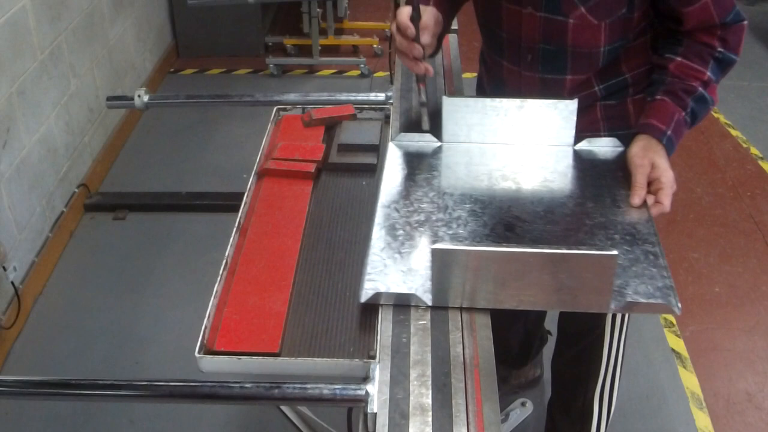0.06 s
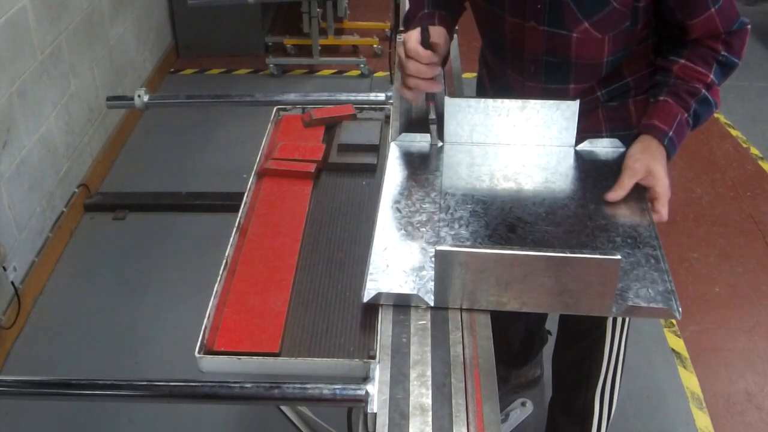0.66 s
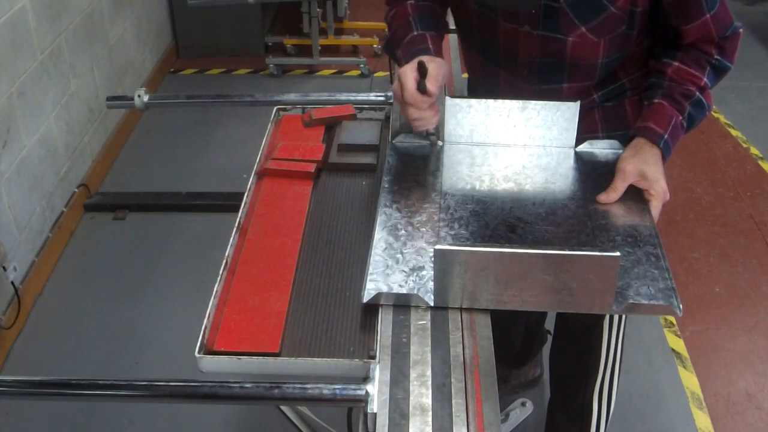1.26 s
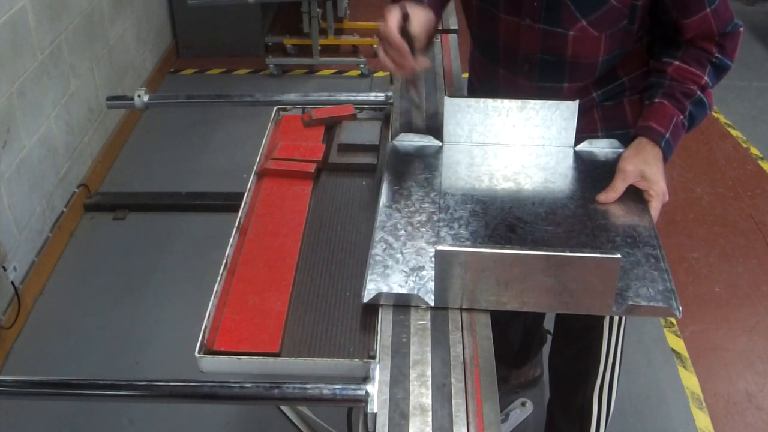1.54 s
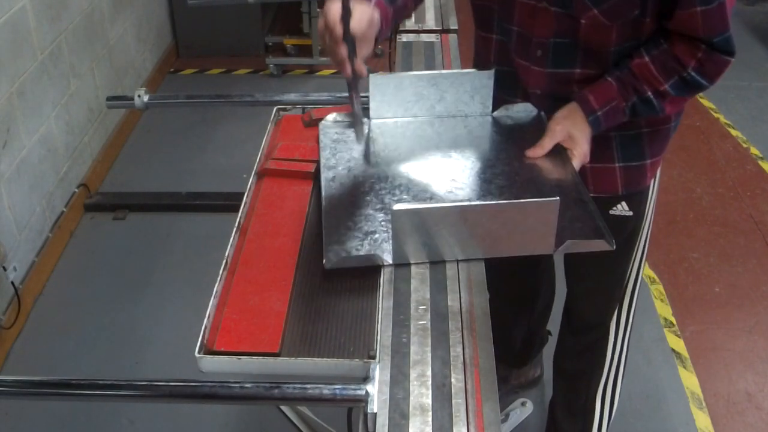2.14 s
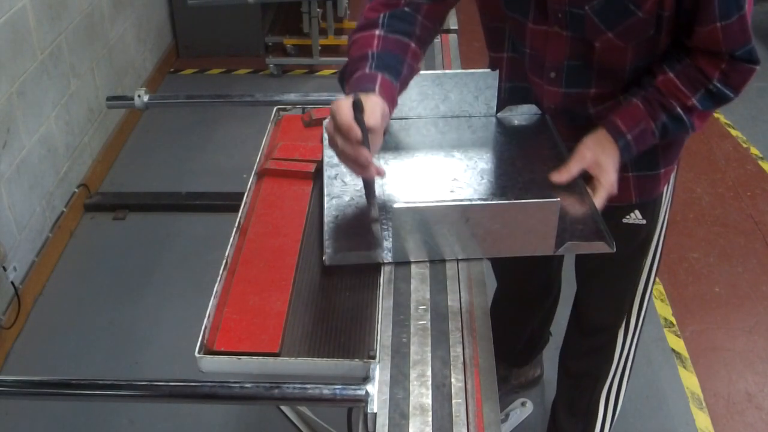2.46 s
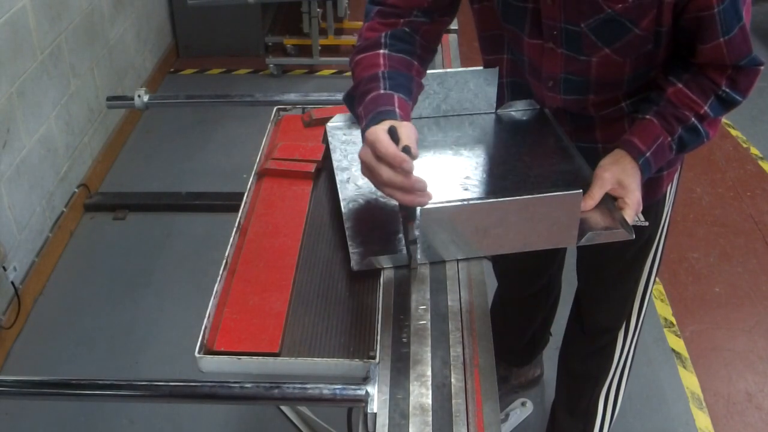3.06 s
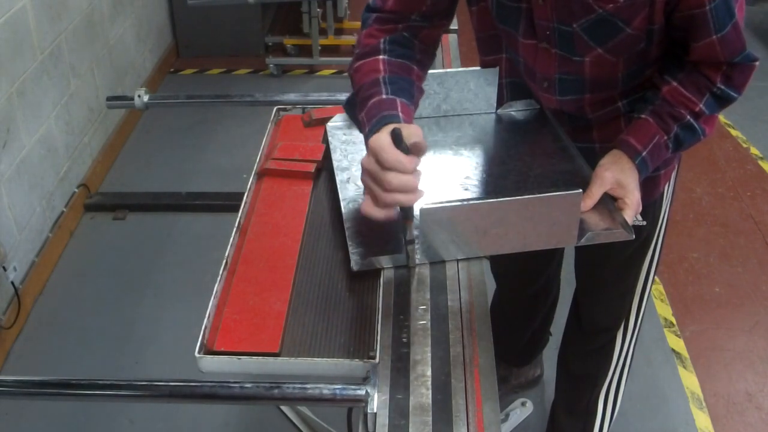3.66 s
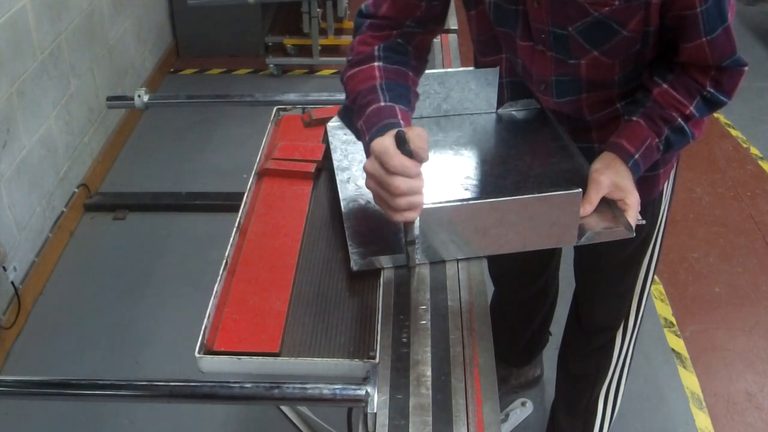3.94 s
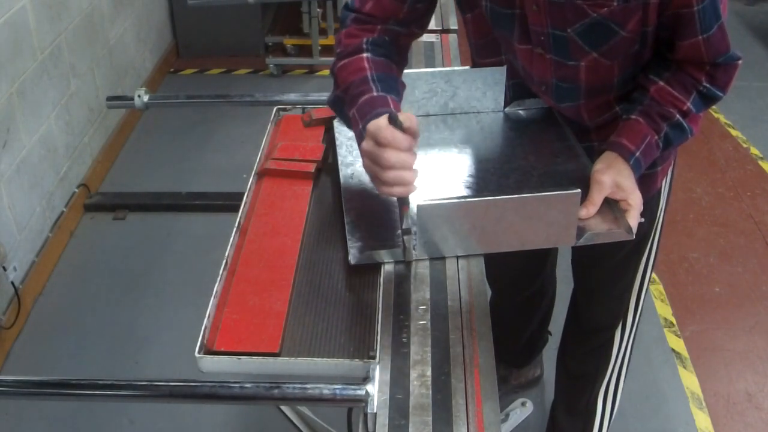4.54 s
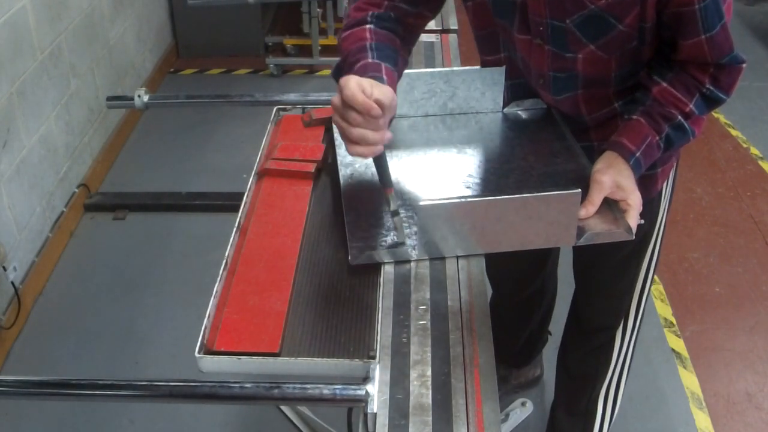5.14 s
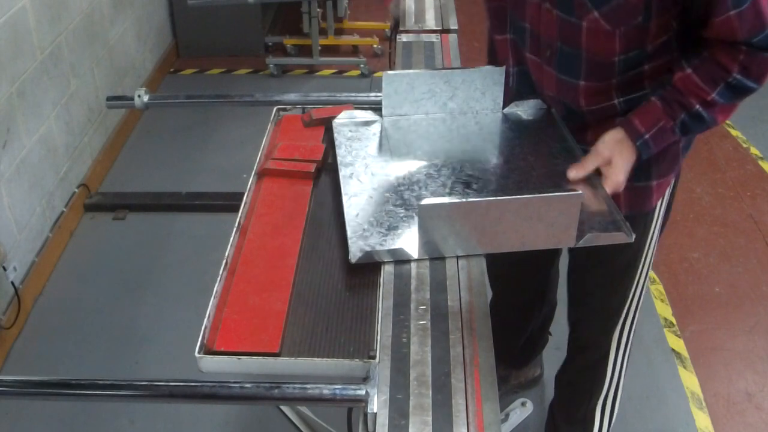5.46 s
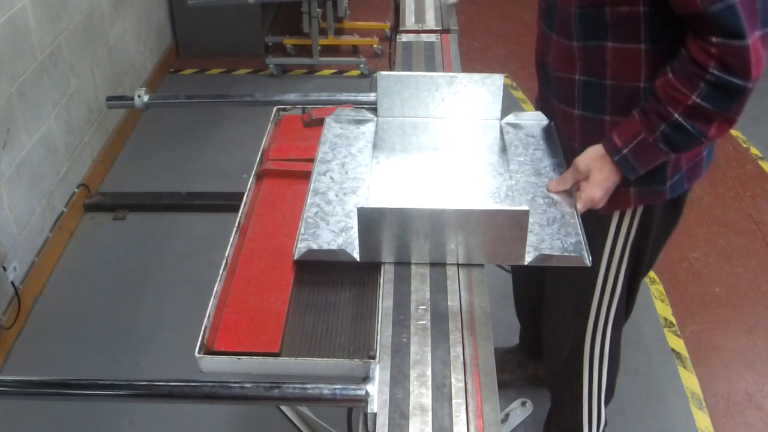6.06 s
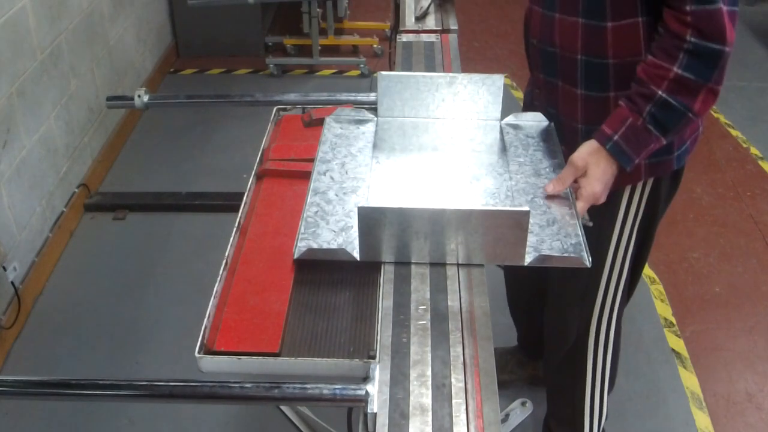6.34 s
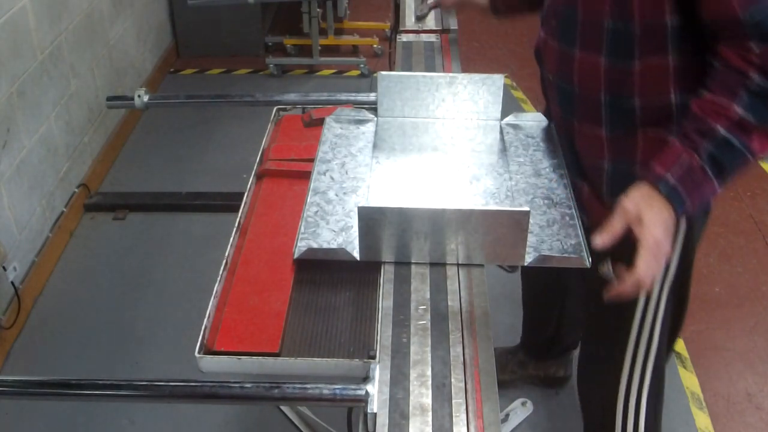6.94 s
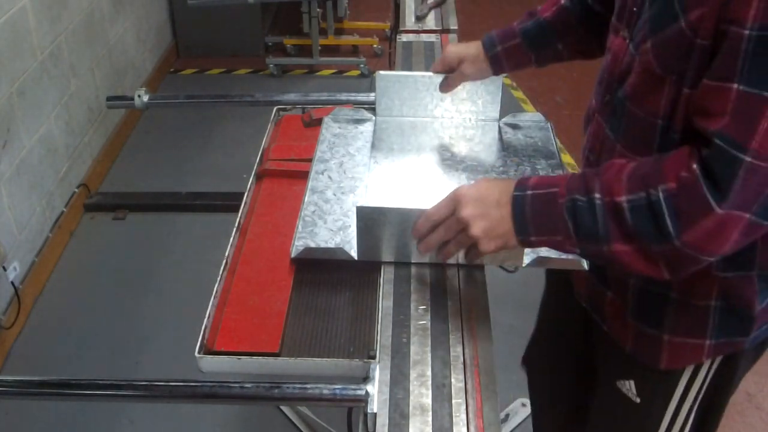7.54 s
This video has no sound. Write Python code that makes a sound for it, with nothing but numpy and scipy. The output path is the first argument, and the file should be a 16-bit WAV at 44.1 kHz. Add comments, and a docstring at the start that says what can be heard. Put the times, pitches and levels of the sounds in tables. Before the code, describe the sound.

In an echoing workshop with a soft low rush, sheet metal knocks and scrapes unevenly across a steel machine bed, joined by a faint wavering tone from its rail. Things quieten, then a clank leads into one very loud, bright slap that slightly overloads the microphone. The tray slides and clanks again, the bed booms dully, pliers clink down a little to the left, and a last soft scrape follows.

```python
"""Working a steel tray with pliers

A folded sheet-steel tray is worked on the steel bed of a machine: it scrapes round in short pushes,
clanks, and slaps down once, hard enough to overload the microphone. The bed's rail sings faintly, the
bed booms, and the pliers are laid aside with a clink. A hard-walled workshop with a low rush echoes."""
import sys
import numpy as np
from scipy import signal
from scipy.fft import rfft, irfft, next_fast_len
from scipy.io import wavfile
from scipy.ndimage import map_coordinates

SR = 44100
rng = np.random.default_rng(int(sys.argv[2]) if len(sys.argv) > 2 else 0)


def generate_wav(sig):
    """Save sig (samples, or channels by samples) to the path in sys.argv[1] as 16-bit PCM at SR."""
    pcm = np.round(np.clip(np.atleast_2d(sig).T, -1, 1) * 32767).astype(np.int16)
    wavfile.write(sys.argv[1], SR, pcm)


N = 343539
TOP_HZ = 15500  # upper limit of the tray's tones and of the microphone


def amp(db):
    return 10 ** (np.asarray(db) / 20)


def rms(x):
    return np.sqrt(np.mean(x ** 2) + 1e-20)


def unit(x):
    return x / rms(x)


def fade(t, t60):
    """Die away by 60 dB in t60 seconds, the 'fade time'."""
    return np.exp(-np.minimum(float(np.log(1000)) * t / np.maximum(t60, 1e-3), 30))


def along(points, hz):
    """Read a curve of (frequency, value) points at hz, on a log scale."""
    point_hz, values = np.transpose(points)
    return np.interp(np.log(hz + 1), np.log(point_hz + 1), values)


def wobble(rate):
    """A smooth curve through rate random values a second."""
    return map_coordinates(rng.standard_normal(int(N * rate / SR) + 4), [np.arange(N) * rate / SR])


def filtered(x, response):
    """Scale each frequency in x by response(hz)."""
    size = next_fast_len(N + SR // 2)
    return irfft(rfft(x, size) * response(np.fft.rfftfreq(size, 1 / SR)), size)[..., :N]


def passed(x, kind, hz, order=5):
    """Keep what lies below hz ("low") or above it ("high")."""
    return signal.sosfilt(signal.butter(order, hz, kind, fs=SR, output="sos"), x)


def three_bands(x, low_hz=600, high_hz=3000):
    """Split x into bass, middle and treble."""
    upper = passed(x, "high", low_hz)
    return passed(x, "low", low_hz), passed(upper, "low", high_hz), passed(upper, "high", high_hz)


def add(track, start, sound):
    """Mix a sound into the track at start seconds."""
    part = track[..., max(0, round(start * SR)):][..., :sound.shape[-1]]
    part += sound[..., :part.shape[-1]]


def stereo(pair, side_db):
    """Left and right from a centre signal and a side signal that adds width."""
    return pair[0] + amp(side_db) * np.array([pair[1], -pair[1]])


def room_rush(level_db=-56):
    """The steady low rush of the workshop."""
    # colour of the noise: (frequency [Hz], level [dB])
    colour = [(22, -27.5), (58, -11), (85, -11.5), (130, -5.5), (400, -11.5), (550, -20), (1000, -15.5),
              (1800, -28.5), (4000, -37), (15500, -39)]
    rush = unit(filtered(rng.standard_normal((2, N)), lambda hz: amp(along(colour, hz))))
    return stereo(rush * amp(level_db + 1.2 * wobble(15)), side_db=-1.5)


def tray_modes(count=560):
    """The tray's natural tones (modes), one a row; its folds crowd them towards the low end."""
    # strongest modes: (pitch [Hz], level [dB], fade time [s])
    strong = [(354, -0.5, 0.69), (386.8, 6.5, 0.38), (470, -2, 0.28), (603.5, 0.5, 0.4), (731, 2.5, 0.3),
              (773, 3, 0.42), (882, 2.5, 0.24), (1027, 1, 0.72), (1075, 4, 0.62), (1168, 1.5, 0.37),
              (1240, 1.5, 0.4), (1296, -1.5, 0.41), (2020, -8, 0.42), (2297, -1.5, 0.23), (2293, 0, 0.35),
              (3225, -3, 0.17), (4560, -4, .2), (6160, -3.5, 0.075), (6540, -4.5, 0.5), (9280, -4.5, 0.24)]
    # weaker modes between them: (pitch [Hz], level [dB])
    weak_levels = [(110, -20), (190, -13), (260, -17), (380, -12), (1100, -2), (1600, -4), (2300, -3.5),
                   (4200, -9.5), (7000, -9.5), (15500, -8.5)]
    # how long those ring: (pitch [Hz], fade time [s])
    weak_fades = [(150, 0.32), (1000, 0.5), (2500, 0.21), (6000, 0.2), (15000, 0.11)]
    weak_hz = 100 + ((np.arange(count) + rng.random(count)) / count) ** 1.3 * (TOP_HZ - 100)
    weak_t60 = along(weak_fades, weak_hz) * np.exp(0.13 * rng.standard_normal(count))
    weak = np.transpose([weak_hz, along(weak_levels, weak_hz), weak_t60])
    hz, db, t60 = np.vstack([strong, weak]).T[:, :, None].astype(np.float32)
    t = np.arange(SR // 2, dtype=np.float32) / SR
    return amp(db) * fade(t, t60) * np.sin(2 * np.pi * hz * t)


def tray_rings(modes, count, spread_db=0.5):
    """The ring (centre and side) at count contact points: each mixes the modes differently."""
    draws = rng.standard_normal((count, 2, 2, len(modes)))
    weights = np.sign(draws[:, 0]) * amp(spread_db * draws[:, 1])
    return (weights.reshape(-1, len(modes)).astype(np.float32) @ modes).reshape(count, 2, -1)


def hand_pushes(slowing_db=9.5, stop_t60=0.26):
    """Each push gets going, slows and stops. Gives curves of ring gain, hiss gain and flatness."""
    # (start [s], length [s], rise time [s], ring [dB], hiss [dB], how flat the tray lies [0-1])
    pushes = [(-.03, 0.16, 0.018, -40.5, -38.5, 0.08), (0.66, 0.16, 0.085, -57.5, -61.5, 0),
              (1.481, 0.03, .04, -28.5, -39.5, 0.34), (1.635, 0.31, 0.17, -41, -40.5, 0.02),
              (1.758, .44, 0.036, -35, -34.5, 0.03), (2.399, 0.18, .05, -39.5, -43.5, 0.57),
              (2.632, 0.032, 0.043, -31, -33, 0.55), (2.723, 0.19, 0.049, -42.5, -42.5, 0.13),
              (3.712, 0.2, 0.039, -54, -64.5, 0.1), (4.197, .11, .075, -48, -48.5, 0.1),
              (5.267, 0.29, 0.18, -44.5, -49, 0.21), (5.625, 0.1, 0.043, -51.5, -51.5, 0.2),
              (5.704, 0.35, .11, -41.5, -47, 0.12), (5.87, 0.11, 0.031, -29, -34, .7),
              (6.176, 0.84, 0.045, -56, -61.5, 0.44), (7.331, 0.14, 0.12, -62.5, -59.5, 0.6),
              (7.462, 0.41, 0.029, -51, -52, 0)]
    start, length, rise, ring_db, hiss_db, flatness = np.transpose(pushes)[:, :, None]
    t = np.arange(0, N / SR, 0.001)
    age = np.maximum(t - start, 0)
    starting = np.sin(np.pi / 2 * np.minimum(age / rise, 1)) ** 2
    slowing = amp(-slowing_db * np.minimum(age / length, 1) ** 2)
    speed = starting * slowing * fade(np.maximum(age - length, 0), stop_t60)
    ring, hiss = (np.linalg.norm(amp(db) * speed, axis=0) for db in (ring_db, hiss_db))
    flat = np.clip((flatness * speed).sum(axis=0) / (speed.sum(axis=0) + 1e-20), 0, 1)
    return [np.interp(np.arange(N) / SR, t, curve) for curve in (ring, hiss, flat)]


def set_ringing(slips, ring):
    """Every slip starts its own copy of the ring."""
    return signal.oaconvolve(slips[None], ring / np.linalg.norm(ring[0]), axes=1)[:, :N]


def tray_scrape(modes, slips_per_s=600, contact_t60=0.17, grit_db=-4, sheen_db=4, level_db=-1):
    """Tiny slips of the sliding tray make it ring and hiss."""
    # steel rubbing on steel: (frequency [Hz], level [dB])
    hiss_colour = [(3000, -4.5), (4200, -2), (7000, -0.5), (11000, -4), (14000, -3), (16000, 0)]
    ring_gain, hiss_gain, flat = hand_pushes()
    judder = 0.34 + 1.46 * flat  # a flat tray slips more unevenly
    damping = fade(np.arange(modes.shape[1]) / SR, contact_t60)
    body = sheen = grit = 0
    for ring in tray_rings(modes, count=3):
        sizes = np.exp(judder * np.clip(rng.standard_normal(N), -2, 2) - judder ** 2 * 0.89)
        slips = (rng.random(N) < slips_per_s / 3 / SR) * sizes * rng.choice([-1, 1], N)
        slips *= amp(0.92 * wobble(14))  # the weight shifts between the contact points
        bass, middle, treble = three_bands(ring * damping)
        body += set_ringing(slips * ring_gain * np.sqrt(SR / slips_per_s), amp(1) * bass + middle)
        sheen += set_ringing(slips, treble)
        grit += slips
    rub = unit(grit * rng.standard_normal((2, N))) * amp(grit_db) + rng.standard_normal((2, N))
    _, _, hiss = three_bands(unit(rub) + amp(sheen_db) * unit(sheen))
    hiss = unit(filtered(hiss, lambda hz: amp(along(hiss_colour, hz))))
    # lying flat, the tray hisses less sharply than on its edge
    hiss -= flat * filtered(hiss, lambda hz: along([(6000, 0.13), (13000, 0.82)], hz))
    hiss *= hiss_gain * amp(0.43 * wobble(21))
    return amp(level_db) * stereo(body + hiss, side_db=-9)


def tray_clanks(modes, tick_db=7, buzz_db=-3, contact_hz=10600, level_db=-2.5):
    """The tray hits the bed or pliers: a sharp tick, a short buzz, and a ring that the hand damps."""
    # (time [s], level [dB], extra bass [dB], extra treble [dB], fade time the grip allows [s])
    blows = [(.026, -38.5, -14, -11, 0.082), (0.4105, -34, -0.5, -1, 0.25), (.583, -61, 9, 11.5, .05),
             (1.436, -46.5, 3.5, -12, 1.8), (1.524, -40, -2, 3.5, 0.79), (1.545, -40, 3, 10.5, 0.18),
             (1.5528, -26, -3, -4, 0.31), (1.775, -30.5, -18, -8, 0.19), (2.2524, -32, -4, -10, 6.5),
             (2.377, -38.5, -7, -10, 0.53), (2.4372, -35.5, -5, -4, 0.76), (2.668, -25, -4, -6, 0.47),
             (2.9686, -37, -0.5, -7, 1.2), (3.5967, -39, 1, -3, 0.21), (3.668, -55, -1, 0.5, 0.33),
             (4.033, -60, 3, 1, 0.26), (4.571, -60, 7, -5, 0.25), (4.721, -22, -5, -3.5, 0.75),
             (4.759, -38, 4.5, 4.5, 0.2), (4.948, -7.5, -8.5, 2, 0.36), (4.9634, -13, -7, -1, 0.1),
             (4.9934, -14, -11, -2.5, 0.3), (5.008, -21.5, -6, 2, .1), (5.307, -40.5, 0, -11, 0.15),
             (5.462, -40.5, -9, -14, 0.077), (5.576, -38.5, -12, -14.5, 0.12), (5.8, -49, -8, -14, 0.08),
             (5.866, -30.5, -8.5, -6, 3.1), (5.925, -28, -14, -6, 1.9), (6.012, -34.5, -0.5, -6, 0.83),
             (6.1267, -36, 0.5, -10.5, 0.47), (6.3127, -31, -2, -2, 2), (6.584, -56, -1.5, 1.5, 0.035),
             (6.66, -49.5, 13.5, 0.5, 0.34), (6.722, -50.5, 13, 12, 0.6), (7.116, -56.5, 7, -9, 0.11),
             (7.594, -37, -8, -7, 0.048), (7.64, -44, 4, -11, 0.076)]
    out = np.zeros((2, N))
    t = np.arange(modes.shape[1]) / SR
    attack = slice(SR // 50)  # the first 20 ms
    contact = amp(buzz_db) * fade(t, t60=0.05) + amp(tick_db) * fade(t, t60=0.0015)
    for (start, db, bass_db, treble_db, grip_t60), ring in zip(blows, tray_rings(modes, len(blows))):
        blow = ring / rms(ring[:, attack]) + contact * rng.standard_normal(ring.shape)
        blow *= fade(t, grip_t60)
        # a sharp edge or a heavy blow stiffens the contact, which makes it brighter
        cutoff_hz = min(contact_hz * 2 ** (treble_db / 11) * (1 + amp(db)), 0.45 * SR)
        bands = three_bands(passed(blow, "low", cutoff_hz, order=2))
        # a flat landing brings out the bass, an edge the treble
        gains = amp([db + bass_db, db, db + treble_db])
        add(out, start, sum(gain * band / rms(band[0, attack]) for gain, band in zip(gains, bands)))
    return amp(level_db) * stereo(out, side_db=-11.5)


def wall_echo(sound, level_db=-3, build_s=0.0013):
    """The echo builds up between the hard walls, then the treble dies first."""
    # how long the room rings: (frequency [Hz], fade time [s])
    fades = [(120, 1.3), (400, 1.11), (1200, 0.87), (2500, 0.69), (5000, 0.48), (9000, 0.44), (12500, 0.33),
             (15500, 0.2)]
    # how wide it sounds: (frequency [Hz], side level [dB])
    sides = [(200, -1), (1500, -6.5), (8000, -1)]
    hz, t, noise = signal.stft(rng.standard_normal((2, SR * 5 // 4)), SR, nperseg=256)
    t60 = along(fades, hz)[:, None]
    colour = amp(along([(1500, 0.012), (10000, -4.5)], hz))[:, None]
    width = amp([np.zeros_like(hz), along(sides, hz)])[:, :, None]
    _, tail = signal.istft(noise * colour * width * fade(t, t60), SR, nperseg=256)
    tail *= 1 - np.exp(-(np.arange(tail.shape[1]) / SR / build_s) ** 2)
    tail *= amp(level_db) * np.sqrt(2 * np.log(1000) / SR)
    return stereo(signal.fftconvolve(sound.mean(axis=0)[None], tail, axes=1)[:, :N], side_db=0)


def short_tones():
    """Single wavering tones: the tray's ringing notes, dull thumps, clicks and a thin scraping squeal."""
    # (time [s], pitch [Hz], level [dB], fade time [s])
    tones = [(.411, 2107, -40, 0.44), (0.41, 998, -37, 0.35), (1.524, 2750, -14, 0.017),
             (1.554, 1082, -24.5, 0.52), (1.554, 3170, -31.5, 0.15), (2.049, 335, -33, 0.17),
             (2.254, 1027, -26, 0.2), (2.253, 1179, -28.5, 0.33), (2.779, 367, -28.5, 0.2),
             (2.969, 1041, -38.5, 0.45), (3.597, 3550, -29, 0.029), (4.721, 1070, -15, 0.33),
             (4.721, 1278, -24, 0.24), (4.721, 2288, -27.5, 0.32), (4.949, 2256, -13.5, 0.22),
             (5.92, 748, -26, 0.36), (6.01, 5480, -45, 0.31), (6.662, 420, -28, 0.074)]
    out = np.zeros(N)
    t = np.arange(SR) / SR
    onset = 1 - fade(t, t60=0.03)
    for start, hz, db, t60 in tones:
        waver = 0.5 * map_coordinates(rng.standard_normal(40), [t * 30])
        add(out, start, amp(db) * np.cos(2 * np.pi * hz * t + waver) * fade(t, t60) * onset)
    return out


def rail_song(waver_db=3, pitch_drift=0.02, level_db=-5):
    """The bed creeps along its rail, which sings with wavering tones that swell and die away."""
    # moves of the bed: (middle [s], length [s], level [dB], pitch [ratio], glide [octaves/s])
    rolls = [(0.683, 0.43, -61, 1.15, 0.038), (2.598, 0.42, -41.5, 1.03, -0.015),
             (3.747, 0.6, -64.5, 1.15, -.45), (7.029, 0.96, -59.5, 1, 0.16)]
    # tones of the rail: (base pitch [Hz], width [Hz], level [dB])
    tones = [(2080, 87, -0.5), (2230, 200, 2.5), (2720, 78, -1), (3390, 2600, 4)]
    t = np.arange(N) / SR
    swell = sum(amp(db) * np.exp(-2 * np.pi * ((t - mid) / span) ** 2) for mid, span, db, *_ in rolls)
    nearest_roll = np.abs(t[:, None] - np.transpose(rolls)[0]).argmin(axis=1)
    middle, _, _, ratio, glide = np.array(rolls)[nearest_roll].T
    bend = ratio * 2 ** (glide * (t - middle))
    song = 0
    for hz, width, db in tones:
        # slow noise, shifted up to the pitch, makes a rough tone
        slow = unit(filtered(rng.standard_normal((2, 2, N)), lambda f: 1 / (1 + (2 * f / width) ** 2)))
        phase = 2 * np.pi * np.cumsum(hz * bend * (1 + pitch_drift * wobble(5))) / SR
        song += (slow[0] * np.cos(phase) + slow[1] * np.sin(phase)) * amp(db + waver_db * wobble(9))
    return stereo(unit(song) * swell * amp(level_db), side_db=-4)


def knocked(knocks, modes):
    """A solid body rings with the same few tones at every knock, at slightly new strengths."""
    out = np.zeros(N)
    t = np.arange(SR) / SR
    for start, knock_db in knocks:
        for hz, mode_db, t60 in modes:
            strength = amp(knock_db + mode_db + rng.normal(0, 0.63))
            add(out, start, strength * fade(t, t60) * np.sin(2 * np.pi * hz * t))
    return out


def bed_booms(level_db=-4):
    """The heavy machine bed booms dully when knocked."""
    # knocks on the bed: (time [s], level [dB])
    thuds = [(6.313, -41.5), (6.662, -50), (6.722, -40.5), (7.115, -50.5)]
    # its tones: (pitch [Hz], level [dB], fade time [s])
    modes = [(63.7, -1.5, 0.49), (129.1, -1.5, 0.62), (176.4, 1.5, 0.54), (189.4, -1.5, 0.82),
             (212, -5.5, 0.087)]
    return knocked(thuds, modes) * amp(level_db)


def pliers_clink(chatter_db=1, chatter_t60=0.15, right_db=-6):
    """Solid steel jaws clink on the bed, a little to the left, and their loose joint chatters."""
    # the landing: (time [s], level [dB])
    clinks = [(6.7212, -27)]
    # tones of the jaws: (pitch [Hz], level [dB], fade time [s])
    modes = [(4600, -27, 0.52), (4830, -21.5, 0.57), (6100, -18, 0.17), (7000, -17.5, 0.23),
             (8300, -11, .14), (8930, -10, .14)]
    # colour of the chatter: (frequency [Hz], level [dB])
    joint = [(3000, -30), (4300, -19), (4700, 2.5), (5250, -14.5), (6500, -9.5), (8600, -0.5), (10000, -12),
             (15000, -16)]
    chatter = np.zeros((2, N))
    t = np.arange(SR // 2) / SR
    colour = amp(along(joint, np.fft.rfftfreq(len(t), 1 / SR)))
    for start, db in clinks:
        buzz = unit(irfft(rfft(rng.standard_normal((2, len(t)))) * colour, len(t)))
        add(chatter, start, amp(db + chatter_db) * buzz * fade(t, chatter_t60))
    return (knocked(clinks, modes) + stereo(chatter, side_db=-7)) * amp([[0], [right_db]])


def scene():
    """The tray, pliers and machine sound into the workshop."""
    modes = tray_modes()
    steel = tray_clanks(modes) + tray_scrape(modes) + pliers_clink() + bed_booms() + rail_song()
    steel = passed(steel, "high", hz=88, order=2)  # these parts give off little deep bass
    tones = short_tones()
    echo = wall_echo(steel + 0.5 * tones)  # the short tones echo less than the rest
    return (steel + tones + echo + room_rush()) * amp([[-0.7], [0.6]])


def record(dry):
    """The microphone rounds off the loudest peaks and loses the very highest treble."""
    clipped = dry / (1 + np.abs(dry) ** 6) ** (1 / 6)
    return filtered(clipped, lambda hz: 1 / np.sqrt(1 + (hz / TOP_HZ) ** 200))


dry = scene()
out = record(dry)
generate_wav(out)
```